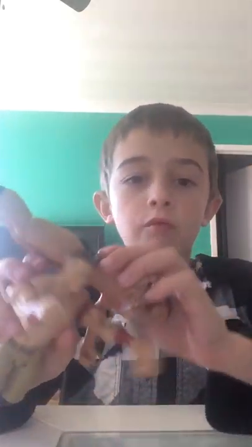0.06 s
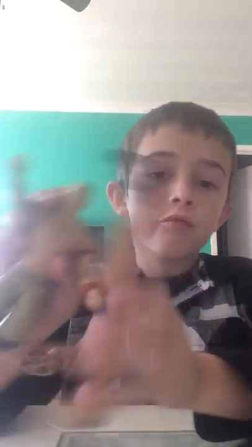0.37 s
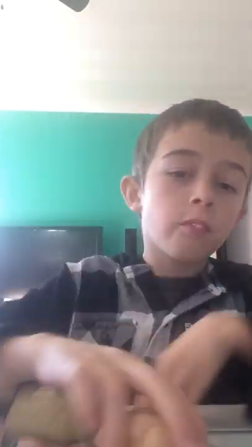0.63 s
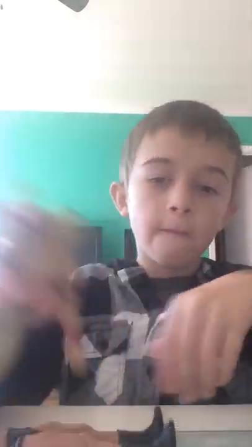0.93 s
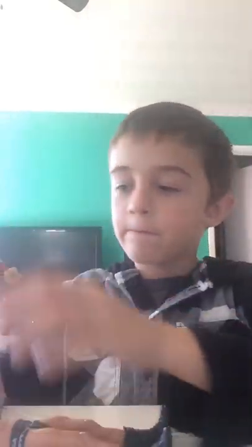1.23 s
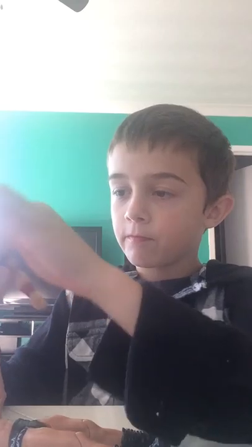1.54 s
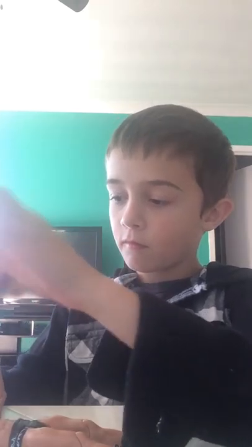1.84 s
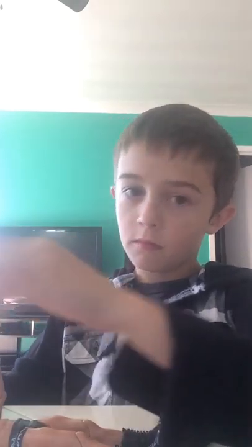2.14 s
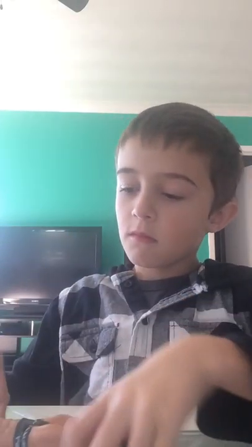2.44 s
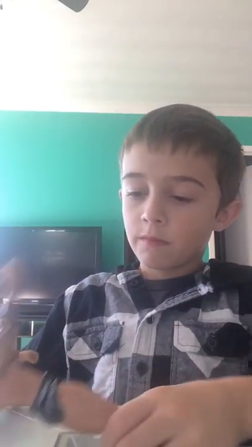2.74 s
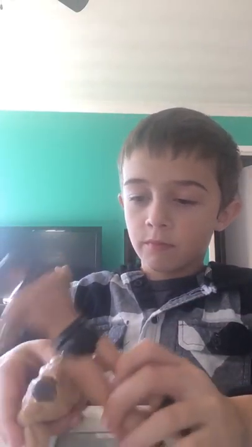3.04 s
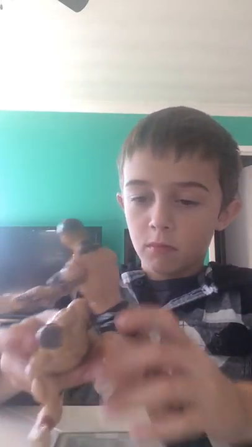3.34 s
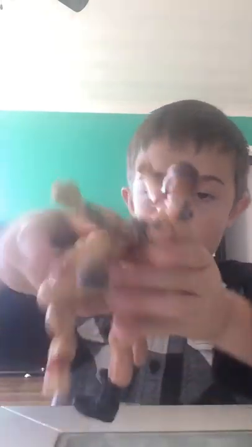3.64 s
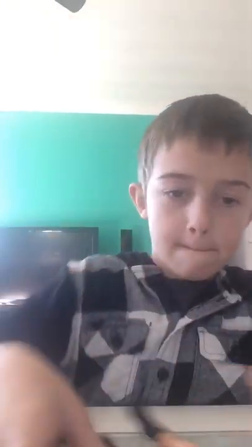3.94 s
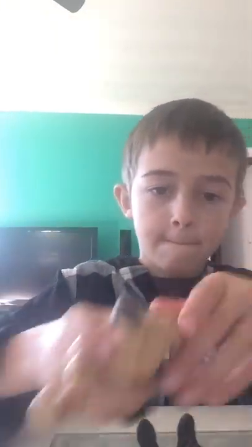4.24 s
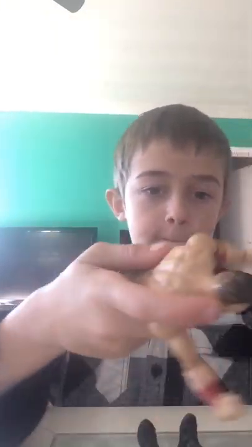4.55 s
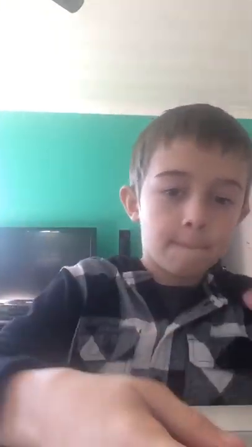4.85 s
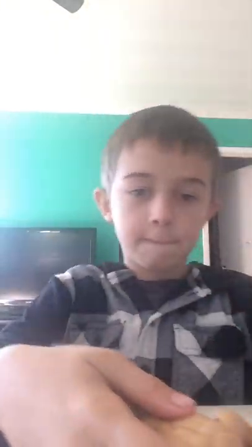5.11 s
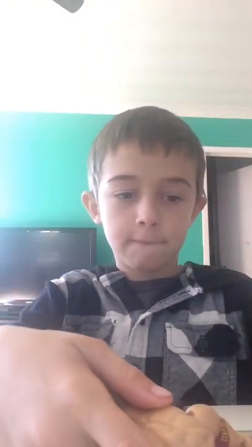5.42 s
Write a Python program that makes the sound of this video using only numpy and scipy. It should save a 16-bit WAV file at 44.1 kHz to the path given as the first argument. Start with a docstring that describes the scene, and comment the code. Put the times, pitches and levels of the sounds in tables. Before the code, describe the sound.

Close to a tabletop in a small room, hard plastic toy figures click lightly, then clatter together in a quick rattling burst. A quieter stretch follows with swishing sleeves, small knocks and a figure sliding across the table. After a brief low rubbing drone, the figures are slammed down in two loud flurries that make the table thump. A faint electrical hum lies underneath.

```python
"""A small room, close to a tabletop: hard plastic toy figures are knocked together and slammed down.
Each knock is a short rattle of limbs that rings the hollow figures and the table; stiff joints click
in between. Bumps rock the table and heavy slams flex it. Sleeves swish, fingers rub the plastic,
a figure slides, and lifting the figures gives a low rubbing drone. Faint mains hum lies under it all."""
import sys
import numpy as np
from scipy import signal
from scipy.fft import rfft, irfft
from scipy.io import wavfile
from scipy.ndimage import uniform_filter1d

SR = 44100
rng = np.random.default_rng(int(sys.argv[2]) if len(sys.argv) > 2 else 0)


def int16_out(signal):
    """Quantize to a 16-bit WAV file."""
    q = np.round(np.clip(np.atleast_2d(signal).T, -1, 1) * 32767)
    wavfile.write(sys.argv[1], SR, q.astype(np.int16))


N = 241631


def amp(db):
    """Decibels to gain."""
    return 10 ** (np.asarray(db) / 20)


def unit_rms(x):
    """Scales to rms 1."""
    return x / np.sqrt(np.mean(x ** 2) + 1e-20)


def burst(x):
    """Scales to the energy of 10 ms at rms 1."""
    return x * np.sqrt(.01 * SR / (np.sum(x ** 2) + 1e-20))


def decay(t, t60_s):
    """Falls 60 dB in t60_s."""
    return np.exp(-np.log(1000) * t / t60_s)


def curve_at(points, hz):
    """Interpolates on a log-frequency axis."""
    points_hz, values = np.transpose(points)
    return np.interp(np.log(hz + 1), np.log(points_hz + 1), values)


def add(mix, start_s, sound):
    """Mixes a sound in at start_s."""
    part = mix[max(round(start_s * SR), 0):][:len(sound)]
    part += sound[:len(part)]


def band(x, lo_hz, hi_hz, order=3):
    """Causal band-pass."""
    return signal.sosfilt(signal.butter(order, [lo_hz, hi_hz], "band", fs=SR, output="sos"), x)


def resonate(x, hz, width_hz):
    """One resonance, peak gain 1."""
    return signal.lfilter(*signal.iirpeak(hz, hz / width_hz, fs=SR), x)


def noise(colour):
    """Steady noise, rms 1, shaped by (frequency [Hz], relative level [dB]) points."""
    gain = amp(curve_at(colour, np.fft.rfftfreq(N, 1 / SR)))
    return unit_rms(irfft(rfft(rng.standard_normal(N)) * gain, N))


def wander(samples):
    """Smooth random curve, rms 1, changing over about this many samples."""
    return unit_rms(uniform_filter1d(uniform_filter1d(rng.standard_normal(N), samples), samples))


def swells(strokes):
    """Gain of friction strokes: 60 dB up in the rise time, 60 dB down in the fall time."""
    t = np.arange(N) / SR
    return sum(amp(db) * decay(np.maximum(peak_s - t, 0), rise_s) * decay(np.maximum(t - peak_s, 0), fall_s)
               for peak_s, db, rise_s, fall_s in strokes)


def background(air_db=-56):
    """Still air and mains hum."""
    # room air spectrum: (frequency [Hz], relative level [dB])
    air_colour = [(15, -36), (25, -12.5), (75, 4.5), (169, -4.5), (281, -8.5), (389, -9), (722, -19.5),
                  (1660, -11.5), (2560, -21), (3000, -21.5), (5580, -29), (7910, -30), (13500, -37),
                  (15500, -33.5)]
    # mains harmonics: (frequency [Hz], rms level [dB])
    harmonics = [(60, -57.5), (120, -62.5)]
    t = np.arange(N) / SR
    hum = sum(amp(db) * np.sqrt(2) * np.sin(2 * np.pi * (hz * t + rng.random())) for hz, db in harmonics)
    return amp(air_db) * noise(air_colour) + hum


def swishes(rise_s=0.00058, whistle_hz=2950, grain=0.2, hiss_db=-29, hiss_growth=.5):
    """Sleeves brush past: grainy rustle, fuzzy whistle, and a hiss that grows less with strength."""
    # sleeve strokes: (time [s], strength [dB], whistle re rustle [dB], t60 [s])
    strokes = [(.121, -63, -14, 27), (.494, -51.5, -16, 1.5), (1.18, -66.5, -1, 1.7), (1.472, -64, 8, 0.85),
               (1.7, -63.5, 7.5, 0.22), (1.867, -61.5, 6, 0.9), (2.208, -42.5, -10, 0.47),
               (2.88, -51, 1, 0.87), (4.468, -48.5, -9.5, 0.58), (4.658, -62.5, -6, 1.2),
               (5.291, -49.5, -9, 0.5)]
    t = np.arange(SR) / SR
    rustle = band(rng.standard_normal(N), 1300, 4100) * np.exp(grain * wander(90))
    whistle = resonate(resonate(rng.standard_normal(N), whistle_hz, 240), whistle_hz, 700)
    hiss = noise([(3000, -29.5), (5000, -7), (6700, -2), (9000, -6.5), (15000, -16.0)])
    hiss *= np.exp(.15 * wander(60))
    gains = np.zeros((3, N))
    for start_s, strength_db, whistle_db, t60_s in strokes:
        levels_db = strength_db, strength_db + whistle_db, hiss_db + hiss_growth * strength_db
        for gain, db in zip(gains, levels_db):
            add(gain, start_s, amp(db) * decay(t, t60_s) * (1 - np.exp(-t / rise_s)))
    return sum(gain * unit_rms(part) for gain, part in zip(gains, (rustle, whistle, hiss)))


def figure_response(samples=16384):
    """One contact on the figures: a minimum-phase tick plus the modes it rings."""
    # plastic contact spectrum: (frequency [Hz], level [dB])
    contact_colour = [(60, -2), (105, 7), (170, 3.5), (260, 11.5), (4000, 3.5), (5300, -2), (7600, -1),
                      (9000, -10.5), (11000, -14.5), (15500, -15)]
    # hollow figure modes: (frequency [Hz], t60 [s], gain [dB])
    modes = [(503.5, 0.13, -8), (627.6, 0.055, 1), (922.5, 0.042, 2.5), (1127, 0.063, -0.5),
             (1387, 0.077, -9), (1654, 0.028, -3.5), (1880, 0.046, 0), (2028, 0.013, 1),
             (2140, 0.057, -4.5), (2873, 0.038, -7), (3310, 0.045, 1.5), (3649, 0.033, 3), (3940, 0.03, 1),
             (4490, 0.018, 0.5), (6000, .08, -9.5), (7480, 0.051, -4)]
    log_gain = np.log(amp(curve_at(contact_colour, abs(np.fft.fftfreq(samples, 1 / SR)))))
    tick = np.fft.ifft(np.exp(np.conj(signal.hilbert(log_gain)))).real
    return tick + sum(amp(db) * resonate(tick, hz, np.log(1000) / np.pi / t60_s) for hz, t60_s, db in modes)


def knocks(response, contact_hz=4500, knee_hz=1200, grain=0.27, q=10, limb_db=4, limb_oct=0.66):
    """A contact, then a dying rattle of tiny ones: bright if hard, dull if cushioned by fingers."""
    # figures striking the table and each other: (time [s], strength [dB], weight on table [dB],
    # tilt above knee [dB/oct], base rattle t60 [s], hollow torso [Hz], hard limb [Hz])
    hits = [(.147, -47.5, -21, -28, 0.014, 680, 6700), (.224, -44.5, -20.5, 1.5, 0.45, 935, 6150),
            (.6501, -24.5, -5, 2.5, 0.17, 685, 3770), (.675, -25, -14.5, -2.5, 0.31, 468, 3370),
            (.694, -19, -14, -2.5, 0.037, 1120, 4900), (0.7022, -18, -13, 2.3, 0.16, 700, 4800),
            (0.72, -17, -31.5, -7.5, 0.062, 572, 1940), (.793, -26.5, -15.5, 0, 0.094, 1260, 2340),
            (.928, -47, -25.5, -2, 0.041, 944, 2400), (0.955, -36, -28, -22, .045, 925, 1990),
            (0.9954, -32, -32.5, -7.5, 0.086, 950, 2150), (1.024, -38.5, -6.5, -6, 0.13, 648, 3440),
            (1.0412, -32.5, -25, -6.5, .012, 660, 3500), (1.062, -33.5, -7, -10, .125, 940, 2130),
            (1.0895, -22, -33, -6, 0.061, 1015, 2100), (1.105, -32.5, -1.5, -3, 0.15, 1020, 1940),
            (1.2531, -38, -10, -13.5, 0.055, 1010, 1970), (1.6051, -40.5, -15, -20, 0.088, 407, 1700),
            (2.403, -36, 5, -7.5, 0.064, 440, 3900), (2.428, -34, -20, -34, 0.029, 470, 6870),
            (2.438, -38.5, -18, -29, 0.075, 596, 6710), (2.486, -41, -28, -12, .11, 550, 6810),
            (2.544, -37.5, -7, -14, 0.43, 346, 6830), (2.679, -41.5, -22, -9, 0.14, 747, 1330),
            (2.7236, -38.5, -30, -3, .067, 770, 2280), (2.745, -42.5, -35, -4.5, 0.047, 770, 2350),
            (2.7634, -33.5, -22.5, -8.5, 0.033, 920, 1420), (2.7772, -34, -16, -0.4, 0.075, 870, 4050),
            (2.955, -44.5, -11, -18, .08, 870, 3080), (2.998, -44.5, -26, -2, 0.043, 1120, 2190),
            (3.0703, -37.5, -29.5, 2.5, 0.031, 388, 2190), (3.079, -33, -5, 0.6, .1, 1087, 2220),
            (3.118, -32.5, -10.5, 0, 0.068, 298, 2180), (3.146, -47, -16, 2.5, .046, 302, 2200),
            (3.236, -47.5, -2, -9.5, 0.2, 291, 7900), (3.8368, -16, -9.5, -0.25, 0.13, 822, 3700),
            (3.9161, -25.5, -16.5, -3, 0.24, 326, 2530), (3.9392, -13.5, -14.5, 1, 0.26, 692, 1900),
            (3.953, -17, -15, 0, 0.13, 554, 3700), (3.967, -18.5, -34.5, -1.7, 0.36, 373, 2020),
            (4.017, -21, -25, -5, 0.085, 367, 1960), (4.0352, -17.5, -23, -2.5, 0.071, 945, 3120),
            (4.096, -25.5, -10.5, -6, 0.074, 720, 1770), (4.116, -20.5, -11.5, -2.5, 0.15, 528, 1780),
            (4.2605, -23.5, -13, -4, 0.13, 502, 3430), (4.32, -29.5, -7.5, -7, .11, 1110, 1880),
            (4.796, -31, -2.5, -12, 0.17, 606, 7410), (4.809, -29, -17, -3, 0.039, 608, 7560),
            (4.8197, -16.5, -6.5, -.5, 0.12, 600, 7740), (4.849, -23.5, -7.5, -2.5, 0.14, 1000, 3740),
            (4.862, -22.5, -21, -3.5, 0.023, 480, 2160), (4.872, -26.5, -5, -2.3, 0.036, 1017, 1740),
            (4.98, -29, -37.5, -5.5, 0.076, 1120, 1920), (5.0897, -38.5, -15, -12.5, 0.11, 1130, 1870),
            (5.183, -35.5, -3, -4.5, 0.078, 365, 2000), (5.2081, -24.5, -7, -4, 0.044, 356, 1960),
            (5.247, -37, -8, -6, 0.099, 325, 1510), (5.453, -49, -1, -4.5, 0.038, 294, 1750)]
    # bands of a knock: (low edge [Hz], high edge [Hz], level [dB], rattle t60 factor [1], rise [s])
    registers = [(73, 286, -1, 1.2, 0.001), (302, 1174, -0.5, 1.23, 0.0011),
                 (1310, 2587, -2, 0.92, 0.00073), (2850, 5020, 0, 0.48, 0.00055),
                 (5270, 14800, -4.5, 0.53, .0001)]
    t, out = np.arange(12000) / SR, np.zeros(N)
    responses = [band(response, lo_hz, hi_hz) for lo_hz, hi_hz, *_ in registers]
    contact = 0.27 * burst(np.exp(-2 * np.pi * contact_hz * t))  # plastic gives for tens of microseconds
    for start_s, strength_db, weight_db, tilt_db_oct, t60_s, torso_hz, limb_hz in hits:
        push, clump = rng.standard_normal((2, len(t)))
        rattle = unit_rms(push * np.exp(grain * unit_rms(uniform_filter1d(clump, 40))))
        for k, (lo_hz, hi_hz, register_db, stretch, rise_s) in enumerate(registers):
            centre_hz = np.sqrt(lo_hz * hi_hz)
            tilt_db = weight_db if k == 0 else tilt_db_oct * max(np.log2(centre_hz / knee_hz), 0)
            lift_db = limb_db * np.exp(-(np.log2(centre_hz / limb_hz) / limb_oct) ** 2)
            force = contact + burst(rattle * decay(t, t60_s * stretch) * (1 - np.exp(-t / rise_s)))
            torso = 2.1 * resonate(force, torso_hz, torso_hz / q)
            limb = 1.5 * resonate(force, limb_hz, limb_hz / q)
            knock = burst(signal.fftconvolve(force + torso + limb, responses[k]))
            add(out, start_s, amp(strength_db + register_db + tilt_db + lift_db) * knock)
    return out


def clicks(snap_t60_s=0.011, ping_t60_s=0.0089):
    """A joint slips: a thin snap and the ping of one small part."""
    # joints and hard edges: (time [s], level [dB], ring [Hz])
    slips = [(0.2359, -33.5, 6100), (0.2404, -30, 6420), (0.2527, -44, 6200), (0.3014, -25, 6530),
             (.321, -42, 6500), (0.34, -39.5, 6740), (.504, -40, 4040), (0.6504, -16, 3580),
             (0.696, -19.5, 1480), (0.7895, -24.5, 2290), (0.822, -37, 3400), (1.024, -47, 3430),
             (1.0412, -38.5, 3620), (1.09, -28.5, 2090), (1.181, -54, 6620), (1.577, -55.5, 7940),
             (2.085, -53, 1530), (2.2113, -49, 2110), (2.7237, -45.5, 2300), (2.778, -36.5, 3240),
             (2.884, -45.5, 2950), (2.998, -46.5, 2170), (3.1197, -31.5, 1940), (3.2641, -48, 8100),
             (3.5688, -35.5, 6960), (3.5922, -49, 5520), (3.722, -47.5, 6300), (3.9163, -29, 4100),
             (4.0354, -25, 3200), (4.262, -32, 3420), (4.377, -57, 7900), (4.798, -27.5, 7240),
             (4.821, -18.5, 7420), (4.847, -18, 6800)]
    t, out = np.arange(3000) / SR, np.zeros(N)
    for start_s, db, hz in slips:
        force = rng.standard_normal(len(t)) * decay(t, snap_t60_s)
        force[0] += 2.5
        snap = band(force, hz / 4, 8000, order=2)  # smaller parts snap thinner
        ping = np.sin(2 * np.pi * hz * t) * decay(t, ping_t60_s)
        add(out, start_s, amp(db) * burst(burst(snap) + 1.5 * burst(ping)))
    return out


def handling(friction, response):
    """Shifting fingers: grainy friction rings the plastic."""
    # finger strokes: (peak time [s], level [dB], rise [s], fall [s])
    strokes = [(.62, -63, 1.5, 0.26), (.92, -52, .15, 1.7), (2.79, -52.5, 1.05, 1.5),
               (5.06, -60.5, .15, 0.37), (5.3, -65, 0.19, 0.39)]
    rub = band(signal.fftconvolve(friction, response)[:N], 490, 2000, order=1)
    return swells(strokes) * unit_rms(rub)


def bumps(rise_s=0.006):
    """A push rings the low table modes, a little differently each time."""
    # soft bumps and the weight of slams: (time [s], level [dB])
    pushes = [(0.605, -41.5), (1.1, -28), (1.607, -45.5), (2.405, -36), (3.967, -22.5), (4.016, -34),
              (4.218, -39), (4.249, -29.5), (4.272, -31), (4.377, -31.5), (4.476, -33), (4.581, -35.5),
              (4.65, -40), (4.738, -39.5), (4.918, -42), (5.153, -30.5), (5.186, -32.5), (5.2984, -39),
              (5.454, -35.5)]
    # tabletop modes: (frequency [Hz], t60 [s], relative level [dB])
    modes = [(287.7, .11, -0.5), (352, 0.22, -5.5), (394, 0.2, -4.5), (508, 0.031, -12), (579, 0.027, 8.5),
             (637, 0.079, -9.5), (911, 0.032, -5.5), (1170, 0.089, -18.5)]
    t, out = np.arange(20000) / SR, np.zeros(N)
    for start_s, db in pushes:
        scatter = rng.standard_normal((len(modes), 2))
        ring = sum(amp(mode_db + vary_db) * decay(t, t60_s) * np.sin(2 * np.pi * hz * t + phase)
                   for (hz, t60_s, mode_db), (vary_db, phase) in zip(modes, scatter))
        add(out, start_s, amp(db) * burst(ring * (1 - np.exp(-t / rise_s))))
    return out


def slams(rise_s=.005):
    """The whole table flexes and booms; its legs shudder an octave below."""
    # heavy blows: (time [s], level [dB], pitch [Hz], t60 [s], shudder re boom [dB])
    blows = [(.695, -43.5, 126, 0.2, -15.5), (2.404, -39, 182, .11, -3), (3.839, -34, 145, .15, -9.5),
             (3.94, -33, 117.6, .21, -11), (4.821, -28.5, 98, 0.3, -10), (5.21, -41, 103.5, 0.18, -10)]
    t, out = np.arange(20000) / SR, np.zeros(N)
    for start_s, db, hz, t60_s, shudder_db in blows:
        boom = np.sin(2 * np.pi * hz * t) + amp(shudder_db) * np.sin(np.pi * hz * t)
        add(out, start_s, amp(db) * burst(boom * decay(t, t60_s) * (1 - np.exp(-t / rise_s))))
    return out


def slide():
    """A figure slides over the table with a friction hiss."""
    # sliding stroke: (peak time [s], level [dB], rise [s], fall [s])
    strokes = [(2.565, -40, 0.76, 0.26)]
    # sliding spectrum: (frequency [Hz], relative level [dB])
    colour = [(530, -0.5), (900, -9.5), (1030, -21), (2310, -10), (2630, -20), (3070, -6.5), (5370, -8.5),
              (6730, 1.5), (9070, -12.5), (11200, -9.5), (15500, -22)]
    return swells(strokes) * noise(colour)


def drone(friction, pitch_hz=206, waver=.05):
    """The figures rub as they are lifted: a rough, wavering low tone."""
    # lifts: (peak time [s], level [dB], rise [s], fall [s])
    strokes = [(3.572, -45.5, 0.14, 0.76), (3.698, -34, 0.072, .55)]
    cycles = np.cumsum(pitch_hz * (1 + waver * wander(700))) / SR
    roughness = unit_rms(band(friction, 180, 320, order=2))
    return swells(strokes) * unit_rms(np.sin(2 * np.pi * cycles) + .7 * roughness)


def room(x, delay_s=0.0046):
    """Dense reflections from near walls, each band dying at its own rate."""
    # room decay: (frequency [Hz], t60 [s])
    decay_times = [(150, 0.7), (500, 0.34), (2000, 0.33), (4000, 0.3), (10000, 0.25)]
    hz, t, spectrum = signal.stft(rng.standard_normal(32768), SR, nperseg=256)
    tail = signal.istft(spectrum * decay(t, curve_at(decay_times, hz)[:, None]), SR, nperseg=256)[1]
    tail *= np.clip(np.arange(len(tail)) / SR / delay_s - 1, 0, 1)
    return signal.fftconvolve(x, tail / np.linalg.norm(tail))[:N]


def scene(knock_room_db=-13.5, click_room_db=-21):
    """Mono mix: knocks fill the room, clicks are nearly dry, cloth and friction are dry."""
    response = figure_response()
    struck = knocks(response) + bumps() + slams()
    clicked = clicks()
    echo = room(amp(knock_room_db) * struck + amp(click_room_db) * clicked)
    sleeves = swishes()
    friction = rng.standard_normal(N) * np.exp(.5 * wander(130))
    rubbing = handling(friction, response) + drone(friction) + slide()
    return (struck + clicked + echo + sleeves + rubbing + background())[None]


def record(dry, ceiling=.9, cutoff_hz=15400):
    """Soft clip, then low-pass."""
    rounded = dry / (1 + (dry / ceiling) ** 4) ** .25
    taps = signal.firwin(255, cutoff_hz, window=("kaiser", 7), fs=SR)
    return signal.oaconvolve(rounded, taps[None], "same")


dry = scene()
out = record(dry)
int16_out(out)
```